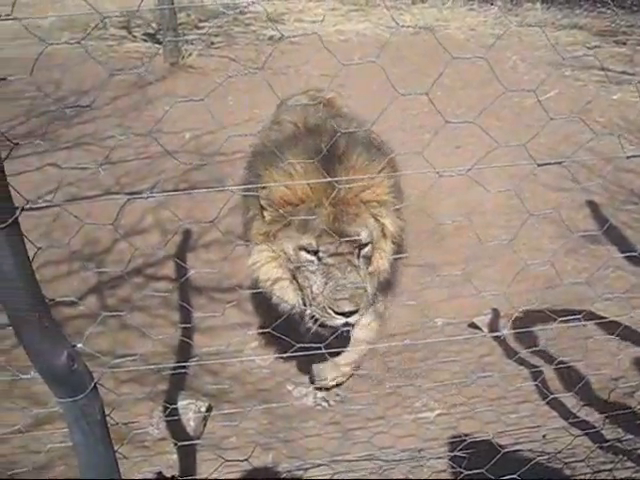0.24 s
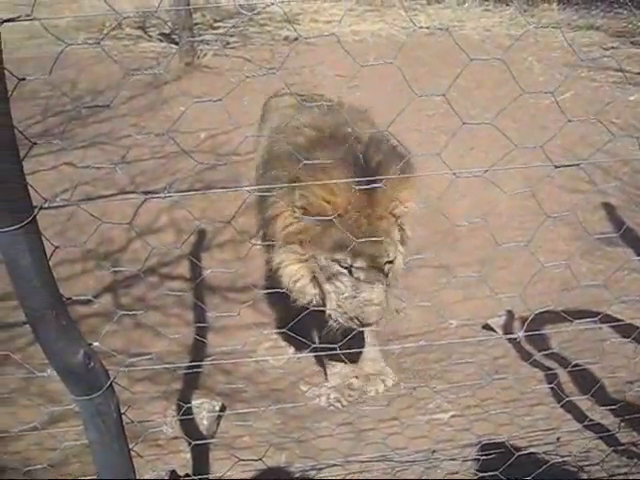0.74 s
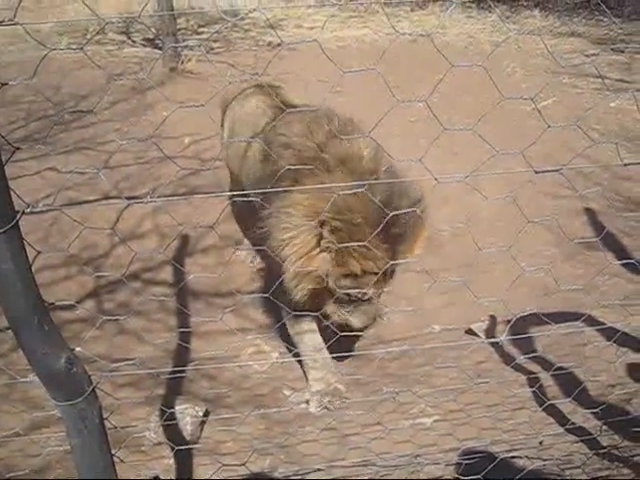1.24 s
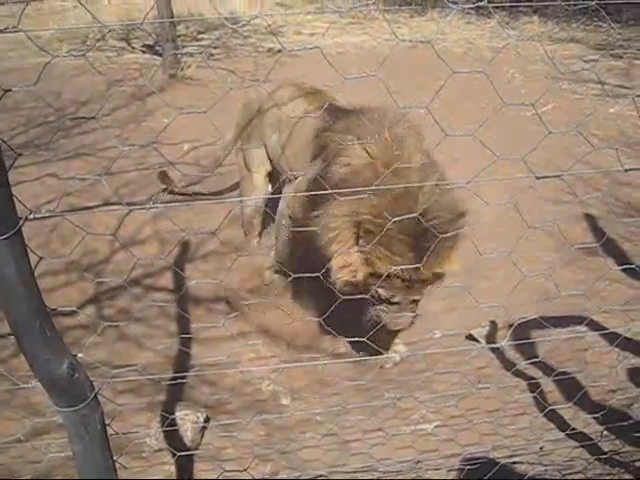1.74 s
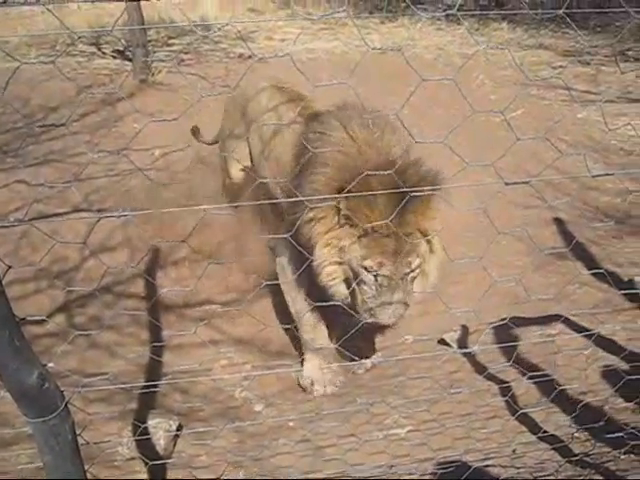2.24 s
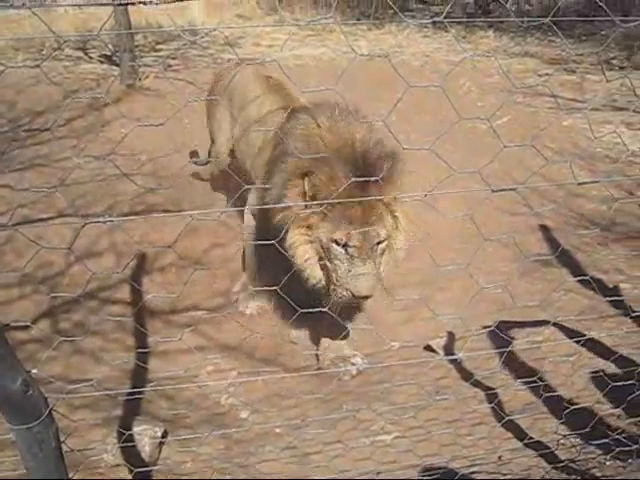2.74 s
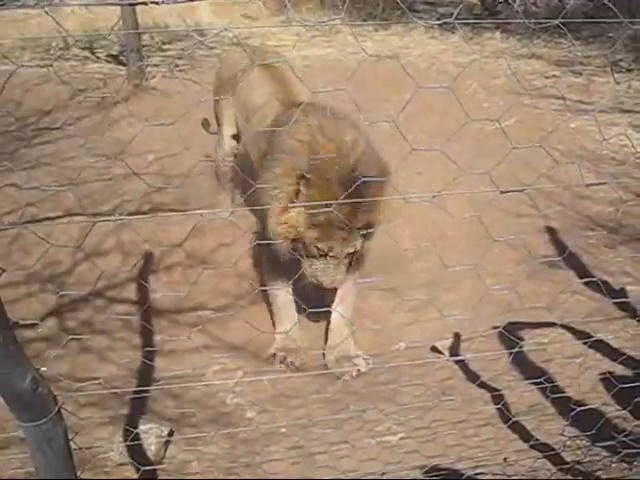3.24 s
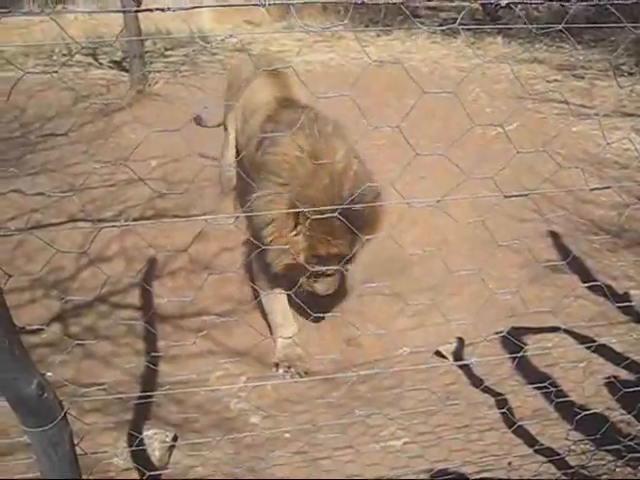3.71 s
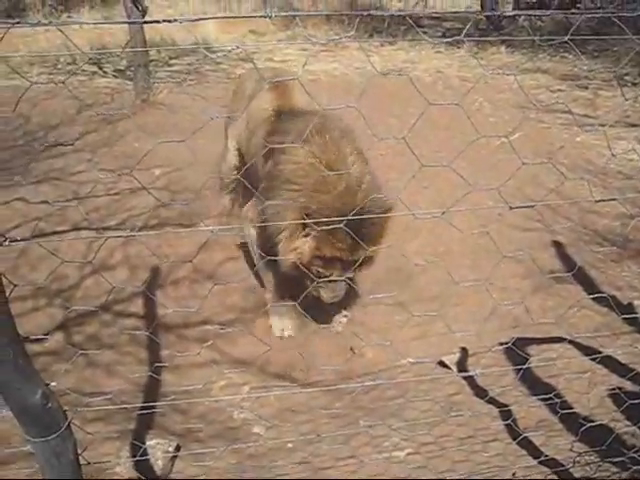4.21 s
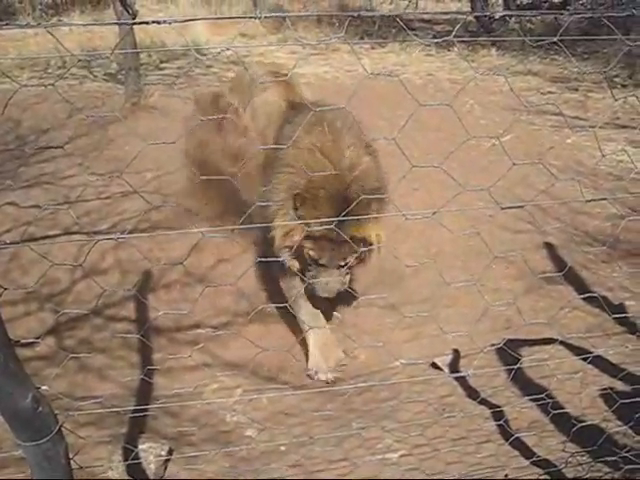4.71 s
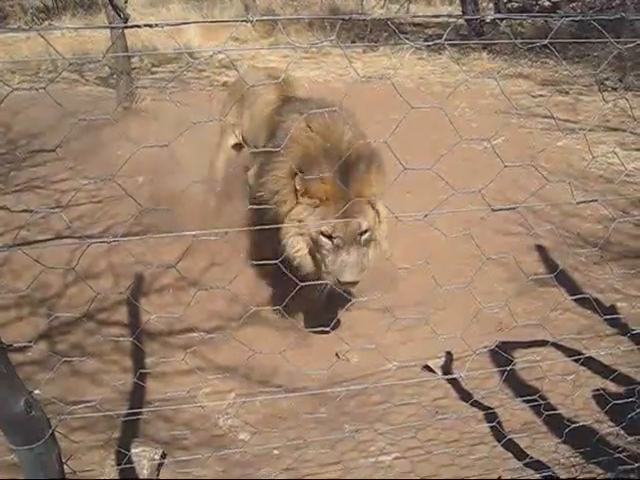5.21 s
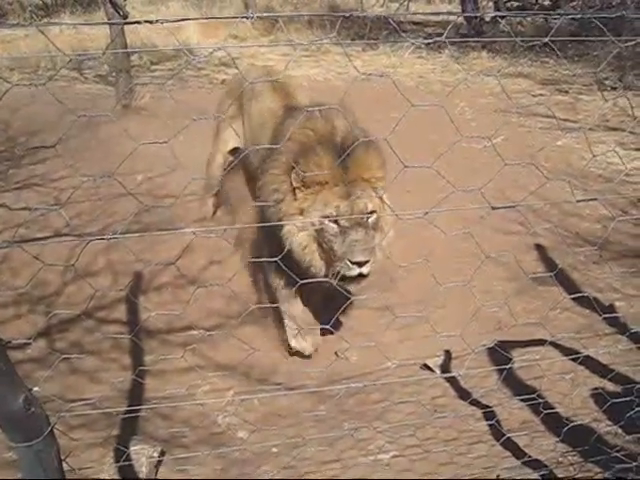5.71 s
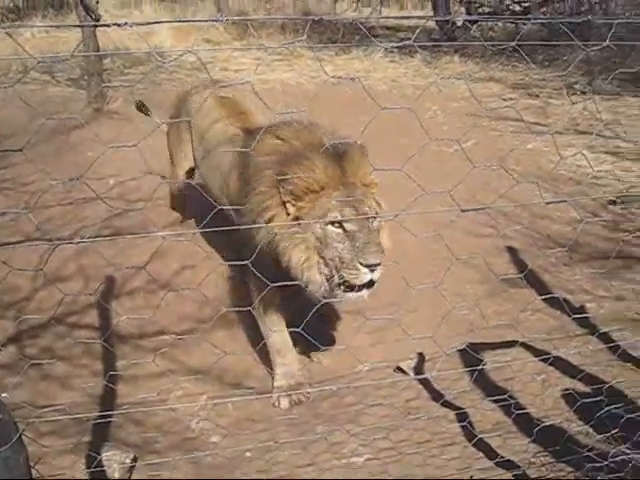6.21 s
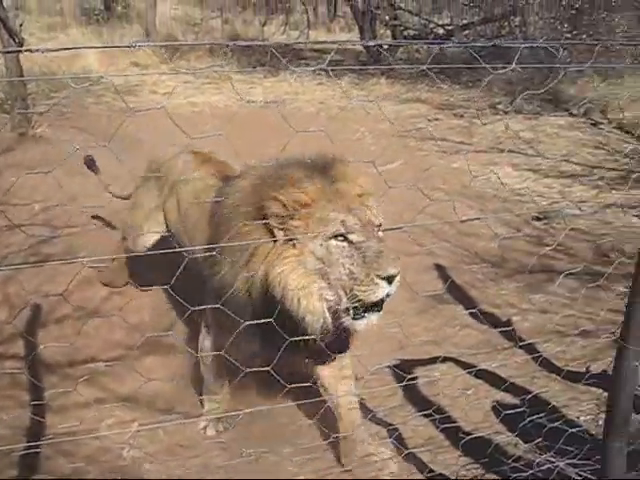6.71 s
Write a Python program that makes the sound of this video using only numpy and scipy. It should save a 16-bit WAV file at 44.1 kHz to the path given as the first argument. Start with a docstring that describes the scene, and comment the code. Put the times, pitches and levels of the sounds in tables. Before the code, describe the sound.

A male lion a few metres away draws a faint breath, then growls in about six short bursts. Each is deep, fluttering and raspy, with a chesty rumble and a hiss of air. In the gaps his paws scuff softly on dry sand, and a twig snaps sharply midway. The last growls come closer together. The setting is quiet open bush with very little echo.

```python
"""First comes a faint breath and a scuff of sand; then a male lion, a few metres away, growls in bursts.
Loose folds in his throat flap about 28 times a second. Each flap makes his chest, windpipe and mouth
ring, and chops his breath into a rasp. Between growls come indrawn breaths, paws scuffing dry sand,
a snapping twig and the quiet air of the bush."""
import sys
import numpy as np
from scipy import signal
from scipy.fft import rfft, irfft, next_fast_len
from scipy.io import wavfile
from scipy.ndimage import uniform_filter1d, map_coordinates

SR = 44100
rng = np.random.default_rng(int(sys.argv[2]) if len(sys.argv) > 2 else 0)


def to_wav(s):
    """Save 16-bit WAV."""
    ch = np.atleast_2d(s).T  # columns
    pcm = np.round(np.clip(ch, -1, 1) * 32767)  # PCM
    wavfile.write(sys.argv[1], SR, pcm.astype(np.int16))


N = 306495


def amp(db):
    """Turn decibels into a number to multiply by."""
    return 10 ** (np.asarray(db) / 20)


def filtered(x, response):
    """Change the tone of x with a filter that leaves white noise at the same power."""
    size = next_fast_len(len(x) + SR // 4)
    gain = response(np.fft.rfftfreq(size, 1 / SR))
    return irfft(rfft(x, size) * gain / np.sqrt(np.mean(np.abs(gain) ** 2)), size)[:len(x)]


def resonances(modes):
    """A filter that rings at the given pitches."""
    return lambda f: sum((-1) ** k * amp(db) * 1j * f * width / (hz * hz - f * f + 1j * f * width)
                         for k, (hz, width, db) in enumerate(modes))


def colour(points):
    """A filter that joins up (Hz, dB) points."""
    hz, db = np.transpose(points)
    return lambda f: amp(np.interp(np.log(f + 1), np.log(hz), db, -120, -120))


def wander(n, step):
    """A smooth random curve of n samples, with a new value every step samples."""
    return map_coordinates(rng.standard_normal(n // step + 4), [np.arange(n) / step])


def patchy(depth_db, size=(18, 4)):
    """Noise with louder and softer patches; size counts steps in frequency and in time."""
    spectrum = signal.stft(rng.standard_normal(N + 512), nperseg=512)[2]
    patches = uniform_filter1d(rng.standard_normal(spectrum.shape), size[0], 0)
    patches = uniform_filter1d(patches, size[1], 1)
    noise = signal.istft(spectrum * amp(depth_db * patches / patches.std()), nperseg=512)[1][:N]
    return noise / noise.std()


# The tone of far air and of sand. Each row: frequency in Hz, relative level in dB.
AIR_TONE = [(15, -35), (25, 0), (146, -4.5), (213, -10.5), (318, -3.5), (397, -10.5), (1220, -4),
            (1400, -12), (3000, -15.5), (3900, -18), (6600, -120)]
SAND_TONE = [(880, -45), (1500, -3.5), (3060, -4.5), (4340, -2.5), (5940, -3), (8270, -5), (11600, -6),
             (15400, -11.5)]
# Paws dragging. Each row: time of the peak in seconds, grain level in dB, low rustle level in dB,
# rise in seconds, fade in dB per second.
SCUFFS = [(.01, -56, -51.5, .02, 63.5), (1.0, -56, -54, 0.15, 25), (1.35, -62, -53, .2, 20),
          (1.52, -52, -58, 0.014, 17), (2.38, -48, -58, .25, 50), (2.72, -56, -50, 0.25, 25),
          (3.48, -40, -60, .1, 60), (3.72, -50, -49, 0.147, 90), (4.134, -46, -50, 0.0415, 40),
          (4.38, -48, -52, .2, 35), (5.47, -50, -62, 0.024, 30), (5.63, -49, -49, 0.1, 52),
          (5.94, -50, -60, 0.033, 37.5)]


def air_and_paws():
    """Quiet air and a faint hiss of sand; both swell when a paw drags and throws grains."""
    t = np.arange(N) / SR
    air_level, sand_level = amp(-51), amp(-56)  # at rest
    for peak, grain_db, rustle_db, rise, fade in SCUFFS:
        swell = np.clip(1 + (t - peak) / rise, 0, 1) * amp(-fade * np.maximum(t - peak, 0))
        air_level += amp(rustle_db) * swell
        sand_level += amp(grain_db) * swell
    grit = patchy(1.6) * amp(2.2 * rng.standard_normal(N // 60 + 1).repeat(60)[:N])
    air = filtered(patchy(2.3), colour(AIR_TONE))
    return air_level * air + sand_level * filtered(grit, colour(SAND_TONE))


# Each row: start in seconds, relative level in dB, rough pitch in Hz, seconds to fade by 60 dB.
TWIG_CRACKS = [(0.064, -28, 1240, 0.036), (.171, -21, 5250, 0.0266), (1.533, -24, 1140, 0.054),
               (2.11, -12.5, 4300, 0.014), (3.925, -33, 8500, .012), (4.077, 4, 8200, 0.011),
               (4.196, -17, 4530, 0.034), (4.289, -20.5, 5700, 0.03), (4.44, -33, 9000, .015),
               (4.548, -45, 900, 0.026), (4.626, -34, 300, .02), (5.311, -11.5, 4300, 0.011),
               (5.375, -13.5, 3670, 0.018), (5.478, -20.5, 288, 0.018), (5.603, -22, 1050, 0.062),
               (5.95, -11, 3500, 0.0123), (6.905, -16.5, 12000, 0.0042)]


def twigs():
    """Twigs and grit crack under the paws, each with a faint scatter after it."""
    out, t = np.zeros(N + SR), np.arange(SR // 10) / SR
    for start, db, hz, fade_s in TWIG_CRACKS:
        burst = rng.standard_normal(len(t)) * (amp(-60 * t / fade_s) + amp(-25 - 60 * t / .091))
        band = resonances([(hz, 1.67 * hz, 0)])
        crack = filtered(burst, lambda f: band(f) * (band(f) + .25) / (1 + (f / 10500) ** 8))
        out[round(start * SR):][:len(t)] += amp(db - 11.5) * crack
    return out[:N]


def ground_echo(x):
    """Sand, fence posts and scrub send back a short, blurred echo."""
    t = np.arange(SR // 4) / SR
    tail = rng.standard_normal(len(t)) * amp(-60 * t / .12) * (t > .006)
    return signal.fftconvolve(x, tail / np.linalg.norm(tail))[:N]


# Each row: frequency in Hz, relative level in dB.
HISS_TONE = [(2000, -1), (3200, 0), (4500, -3), (6500, -5.5), (9000, -11), (12000, -16.5), (15500, -32)]


def teeth_hiss(air, clean):
    """Air hisses past the teeth, less so when the flapping is clean."""
    return filtered(air * np.sqrt(1 - .69 * clean), colour(HISS_TONE))


# One row per breath. Each row: first flap in seconds, number of flaps that follow, then the gap
# between flaps in milliseconds at the start, middle and end.
FLAPS = [(.11, 7, 37, 37, 37), (.456, 14, 34.1, 32.1, 37), (1.586, 16, 26.1, 37.7, 41.9),
         (2.977, 19, 34.6, 34.5, 36.8), (4.709, 18, 33.5, 33.3, 40.9), (5.702, 5, 40, 32, 30),
         (5.972, 14, 33.5, 34.7, 39), (6.6, 7, 39, 39.5, 40), (6.948, 0, 33, 33, 33)]
# Flaps that stand out. Each row: time in seconds, extra level in dB.
ACCENTS = [(.456, 2), (.592, 5), (.687, 2.5), (.754, 1.5), (.859, 2.5), (1.612, 5), (1.7, -0.5),
           (1.956, 8.5), (2.977, 4), (4.74, 3), (4.941, 0), (4.977, 3), (5.812, 5), (5.972, 3),
           (6.006, 3.5), (6.141, 5), (6.176, 1.5), (6.21, 3), (6.245, 1), (6.281, 3.5), (6.394, 3),
           (6.43, 5), (6.797, 0.5), (6.837, 4.5)]


def throat_folds(k, a, b):
    """The folds slap together in breath k (samples a to b). Gives flap positions, accents and pushes."""
    first, more, *gaps_ms = FLAPS[k]
    gaps = np.interp(np.linspace(0, 1, more), [0, .5, 1], gaps_ms) / 1000
    times = first + np.cumsum(np.append(0, gaps))
    jitter, force, lag, rebound = rng.standard_normal((4, len(times)))
    flaps = ((times + .00052 * jitter) * SR).astype(int).clip(a, b - 1) - a
    accent = amp(sum(db * (abs((a + flaps) / SR - when) < .01) for when, db in ACCENTS))
    slaps = np.zeros(b - a)
    slaps[flaps] = np.sqrt(np.mean(gaps_ms) / 1000 * SR) * amp(1.27 * force) * accent
    # the folds never close all at once, so a weaker slap follows
    second = (flaps + SR * (.0004 + .001 * abs(lag))).astype(int).clip(0, b - a - 1)
    slaps[second] += .55 * np.tanh(2 * rebound) * slaps[flaps]
    pushes = signal.lfilter([.045], [1, -1.6, .64], slaps)  # soften the sharp clicks
    return flaps, accent, pushes


def airflow(flaps, accent, clean):
    """How strongly air flows: it puffs at each flap, and leaks in between when the flapping is rough."""
    n, t = len(clean), np.arange(SR // 8) / SR
    kicks = np.zeros(n)
    kicks[np.maximum(flaps - int(.004 * SR), 0)] = amp(2.1 * rng.standard_normal(len(flaps))) * accent
    puff = (1 - np.exp(-t / .0021)) * np.exp(-t / .011)
    leak = .7 * (1 - clean)
    flow = leak + np.convolve(kicks, puff)[:n]
    flow /= np.sqrt(np.mean(flow[flaps[0]:flaps[-1] + 400] ** 2))
    spit = amp(2.8 * wander(n, 150))  # spit breaks the flow into uneven bursts
    return flow * spit / np.sqrt(np.mean(spit ** 2))


def voice(pushes, flow, clean):
    """Blend the throat's two sounds: clean = 1 is all flaps, clean = 0 is all rushing air."""
    return np.sqrt(clean) * pushes + np.sqrt(1 - clean) * flow * rng.standard_normal(len(flow))


def chest(flaps, flow, db, hz):
    """Each flap sets the chest booming, and the rushing air makes it rumble."""
    n, t = len(flow), np.arange(SR // 8) / SR
    boom = np.zeros(n + len(t))
    fade = np.exp(-t / .015) * (1 - np.exp(-t / .0015))
    for i in flaps:
        pitch = hz[i] * rng.normal(1, .07)
        boom[i:i + len(t)] += amp(db[i] + 9.5) * np.cos(2 * np.pi * pitch * (t - .001)) * fade
    rumble = filtered(amp(db - 7) * flow * rng.standard_normal(n), resonances([(109.6, 29, 0)]))
    return boom[:n] + rumble


# One row per breath. Each row: two resonances, each with pitch in Hz, width in Hz, relative level in dB.
WINDPIPE = [
    [(330, 83, -11), (457, 13, 1.5)],
    [(241, 11, -1.5), (344, 69.4, 0)],
    [(189, 16, -2), (323, 31.8, -1)],
    [(199, 120, -7), (322, 50, -1)],
    [(182, 30, 1), (337, 25, 0)],
    [(289, 128, -11.5), (449, 18, 5)],
    [(292, 60, 0), (460, 42, 0.5)],
    [(254.3, 59, -9), (416.5, 28.2, 5.5)],
    [(298, 79, -1), (440, 190, -7)],
]


def windpipe(k, drive):
    """The windpipe rings at two low pitches and passes little above them."""
    muffle = signal.butter(4, 1.3 * WINDPIPE[k][-1][0], fs=SR)
    return signal.lfilter(*muffle, filtered(drive, resonances(WINDPIPE[k])))


# Each row: start and end in seconds, first and last pitch in Hz, width in Hz, relative level in dB.
JAW_SLIDES = [(1.582, 1.655, 714, 1010, 70.4, -4), (2.965, 3.034, 781, 1110, 70, 1),
              (4.695, 4.765, 724, 886, 60, -5), (1.67, 1.91, 1630, 1160, 89, -7),
              (1.719, 2.15, 2800, 1910, 109, -7.5), (3.146, 3.447, 1330, 2240, 89, -8.5),
              (4.766, 5.22, 1254, 995, 80, -5.5), (4.816, 5.286, 2170, 1690, 101, -4.5),
              (5.993, 6.302, 865, 614, 50, -37), (4.76, 5.0, 5350, 4800, 200, -12),
              (3.05, 3.2, 850, 1020, 50, -10)]


def jaw_slides(drive, now):
    """As the jaw moves, single resonances of the mouth slide up or down."""
    out = np.zeros(len(now))
    for start, end, from_hz, to_hz, width_hz, db in JAW_SLIDES:
        if now[0] < start < now[-1]:
            turn = np.exp(2j * np.pi * np.cumsum(np.interp(now, [start, end], [from_hz, to_hz])) / SR)
            window = np.clip(np.minimum(now - start, end - now) / .0043, 0, 1)
            decay = np.exp(-np.pi * width_hz / SR)
            ring = turn * signal.lfilter([1], [1, -decay], drive * window / turn)
            out += amp(db) * np.sqrt(2 * (1 - decay ** 2)) * ring.real
    return out


# One row per breath. Each row: an early and a late list of resonances, laid out as in WINDPIPE.
MOUTH_SHAPES = [([(871, 46, 2.5), (1314, 91, 1), (2496, 90, -6)], [(867, 55, -2), (1194, 35, -6)]),
                ([(857, 155, 6), (1188.4, 102, 8.5), (1477, 67, 3), (2060, 270, 1), (2770, 180, -0.5),
                (3540, 220, -1.5)], [(658, 41, -9), (1000, 53, 2.5), (1620, 109, -9), (2220, 156, -12),
                (2784, 130, -15), (3860, 143, -11.5)]), ([(981, 59, 0.5), (1277, 116, 2), (1706, 344, -5),
                (2340, 150, -4.5), (2674, 130, -1), (3550, 136, -9.5), (3760, 150, -10)], [(931, 55, 4.5),
                (1270, 140, 1), (1500, 63, -9), (1850, 180, -0.5), (2080, 97, 5), (2520, 240, -7),
                (3600, 120, -35.5)]), ([(940, 48, 4.5), (1600, 173, -7.5), (2240, 180, -6.5),
                (2914, 85, -8), (3340, 56, -21.5), (3830, 50, -11.5)], [(788, 27, -0.5), (1225, 165, 1),
                (2120, 270, -3), (2830, 110, -8), (3400, 190, -13), (4000, 130, -19)]), ([(940, 95, 4),
                (1254, 280, 4), (1786, 63, -1.5), (2030, 106, 6.5), (2850, 110, -8), (3280, 130, -9),
                (3900, 140, -7)], [(715, 16, -12), (1004, 21, 1.5), (1740, 150, -13), (2200, 88, -16),
                (2740, 220, -14.5), (3440, 81, -40), (3970, 110, -24.5)]), ([(880, 43, 13.5),
                (1460, 160, 0.5), (2693, 110, -6.5), (4040, 43, -26)], [(794, 30, 3.5), (2067, 200, -15),
                (2895, 54, -12.5), (3920, 120, -13)]), ([(619, 43, 1.5), (843, 60, 2.5), (1142, 18, 8.5),
                (1380, 220, -7.5), (1920, 110, -7), (2500, 190, -3.5), (3030, 76, -6), (3420, 87, -3.5),
                (3940, 77, -14)], [(581.5, 16, -6), (777, 10.6, -2), (947, 23, -7), (1140, 250, -12.5),
                (1880, 470, -19), (2420, 136, -14), (2860, 130, -14)]), ([(720, 120, -4.5), (1038, 61, 0),
                (1269, 49, -1), (1864, 46, -9.5), (2180, 25, -7.5), (4170, 130, -19)], [(695, 36, 0.5),
                (953, 17, 3.5), (1196, 85, -7), (1827, 26, -5), (3500, 75, -13)]), ([(730, 160, -7),
                (2520, 600, -11)], [(930, 280, 1), (2550, 206, -7)])]


def mouth(k, drive, progress):
    """The mouth rings like a vowel, fading from its early shape to its late one."""
    early, late = MOUTH_SHAPES[k]
    blend = np.clip(2.11 * progress - .6, 0, 1)
    vowel = filtered(drive * np.sqrt(1 - blend), resonances(early))
    vowel += filtered(drive * np.sqrt(blend), resonances(late))
    lowest_hz = min(early[0][0], late[0][0])  # little gets through below this
    vowel = signal.lfilter(*signal.butter(2, .59 * lowest_hz, "high", fs=SR), vowel)
    tremble = 16 * wander(len(drive), 1500)  # trembling tongue and lips make the pitches waver
    return map_coordinates(vowel, [np.arange(len(drive)) + tremble], mode="nearest")


# How hard he pushes, one list per breath. Each row: time in seconds, relative chest and mouth levels in dB.
EFFORT = [
    [(.07, -67, -38.5), (.14, -65, -56), (.22, -64.5, -47), (.3, -60, -41.5), (.37, -53.5, -50)],
    [(.448, -22.5, -14.5), (.55, -31.5, -20), (.68, -19.5, -19), (.79, -17.5, -18), (.865, -25, -13.5),
     (.9, -25, -27), (.94, -26, -17)],
    [(1.584, -19.5, -24), (1.646, -18, -18.5), (1.78, -21, -21), (1.91, -26, -27), (1.97, -20.5, -24.5),
     (2.04, -20, -25), (2.17, -40.5, -34)],
    [(2.974, -20.5, -16.5), (3.01, -20, -20.5), (3.09, -24.5, -15.5), (3.19, -26, -20), (3.25, -24, -22),
     (3.45, -20.5, -32), (3.6, -22, -30.5), (3.66, -38, -31)],
    [(4.706, -20.5, -26), (4.77, -18.5, -18), (4.87, -25, -24.5), (4.95, -18.5, -19.5), (5.15, -19.5, -23),
     (5.25, -21, -20), (5.355, -27, -24)],
    [(5.67, -43, -33.5), (5.74, -43.5, -28.5), (5.82, -33, -26.5), (5.89, -43.5, -42)],
    [(5.962, -14.5, -17), (6.012, -22, -18), (6.08, -31.5, -18), (6.19, -20.5, -19.5), (6.32, -22, -17.5),
     (6.41, -21.5, -17), (6.48, -39, -26.5)],
    [(6.55, -33.5, -29), (6.61, -22.5, -23.5), (6.7, -28.5, -26.5), (6.82, -20.5, -20), (6.885, -34.5, -27)],
    [(6.944, -16, -8), (6.95, -19, -25)],
]
# One row per breath. Each row: chest pitch in Hz, windpipe boost over the chest effort in dB, hiss boost
# over the mouth effort in dB, each given three times (start, middle, end).
BALANCE = [(145, 160, 140, 10, 14, 2, -5.5, -18, -15), (134, 101, 122, 2.5, -4, -8, -10.5, -11, -16),
           (116, 87, 133, -3.5, -17, -23, -12.5, -18.5, -19), (107, 133, 123, -6, -10, -9, -14, -13, -17),
           (104, 104, 124, -9, -10, -14, -17.5, -9, -12.5), (148, 123, 250, 9, -1.5, -11, -36, -12, -12.5),
           (122, 108, 140, -4, -6, 1.5, -7, -10.5, -9), (129, 126, 137, -2, -1, 3.5, -9, -6.5, -4.5),
           (130, 130, 130, 14, 9, 16, -7, -7.5, -4)]
# Clean flapping against rushing air, one row per breath. Each row: clean share (0 to 1) in the opening
# slaps, their length in seconds, share just after them, share at the end.
CLEAN_SHARE = [(.03, .02, .03, .03), (.2, .14, .28, .97), (.88, .06, .25, .36), (.9, 0, .2, .34),
               (.85, .04, .3, .85), (.1, .02, .12, .35), (.65, .04, .35, .97), (.12, .2, .3, .55),
               (.8, .02, .8, .8)]
ATTACK_S, RELEASE_S, LOOSEN_S = .012, .028, .026  # fade in, fade out, change from opening slaps to air


def breath(k, rasp):
    """One growl or gasp: flapping folds and rushing air sound through chest, windpipe, mouth and teeth."""
    times, chest_effort, mouth_effort = np.transpose(EFFORT[k])
    begin, end = times[0], times[-1]
    a, b = int((begin - ATTACK_S) * SR), min(N, int((end + RELEASE_S + .24) * SR))
    now = np.arange(a, b) / SR
    progress = (now - now[0]) / (end - begin + ATTACK_S + RELEASE_S)
    fade_db = np.interp(now, [begin - ATTACK_S, begin, end, end + RELEASE_S], [-26, 0, 0, -26], right=-120)
    chest_db = np.interp(now, times, chest_effort) + fade_db
    mouth_db = np.interp(now, times, mouth_effort) + fade_db
    chest_hz, pipe_boost, hiss_boost = (np.interp(now, np.linspace(begin, end, 3), three)
                                        for three in np.reshape(BALANCE[k], (3, 3)))
    opening, opening_s, after, final = CLEAN_SHARE[k]
    loose = begin + opening_s + LOOSEN_S
    clean = np.interp(now, [loose - LOOSEN_S, loose, max(end, loose + LOOSEN_S)], [opening, after, final])
    flaps, accent, pushes = throat_folds(k, a, b)
    flow = airflow(flaps, accent, clean)
    sound = chest(flaps, flow, chest_db, chest_hz)
    sound += windpipe(k, amp(chest_db + pipe_boost) * voice(pushes, flow, np.cbrt(clean)))
    drive = amp(mouth_db) * voice(pushes, flow, clean)
    sound += mouth(k, drive, progress) + jaw_slides(drive, now)
    sound += amp(mouth_db + hiss_boost + 1.5) * teeth_hiss(flow * rasp[a:b], clean)
    return np.pad(sound, (a, N - b))


def scene():
    """The lion and his echo over air, sand and twigs, in one channel."""
    rasp = patchy(3, size=(5, 14))  # narrow bands that last about a tenth of a second
    lion = sum(breath(k, rasp) for k in range(len(EFFORT)))
    return (air_and_paws() + twigs() + amp(-9) * ground_echo(lion) + lion)[None]


def record(dry):
    """The microphone loses deep bass; the converter clips the peaks and drops the highest treble."""
    thin = signal.lfilter(*signal.butter(2, 26, "high", fs=SR), dry)
    clipped = np.clip(thin, -1, 1)
    return irfft(rfft(clipped) * (np.fft.rfftfreq(N, 1 / SR) < 15600), N)


dry = scene()
out = record(dry)
to_wav(out)
```